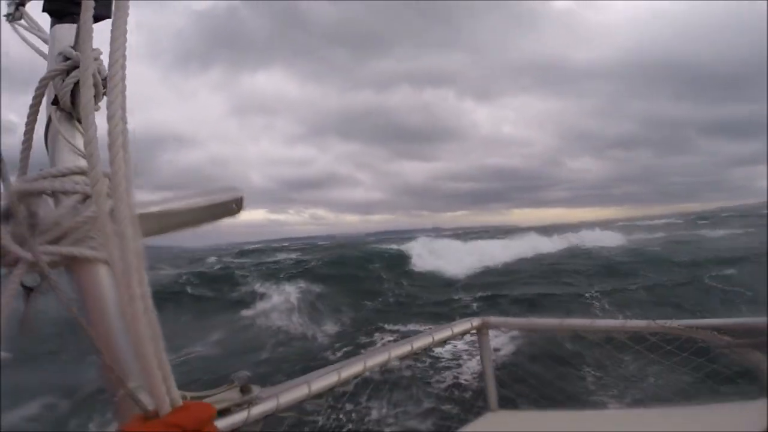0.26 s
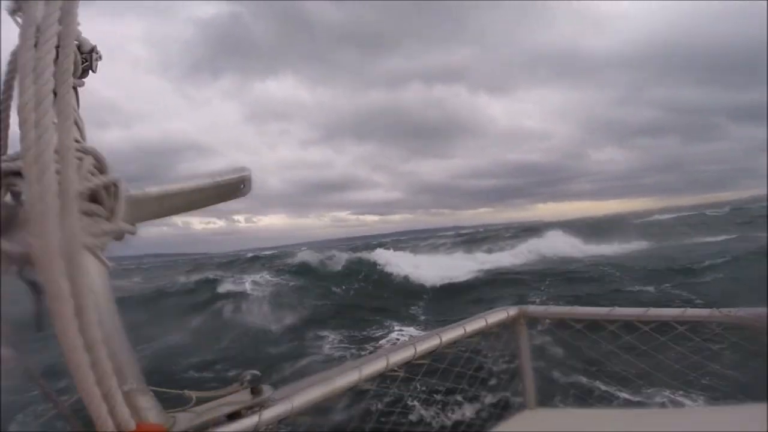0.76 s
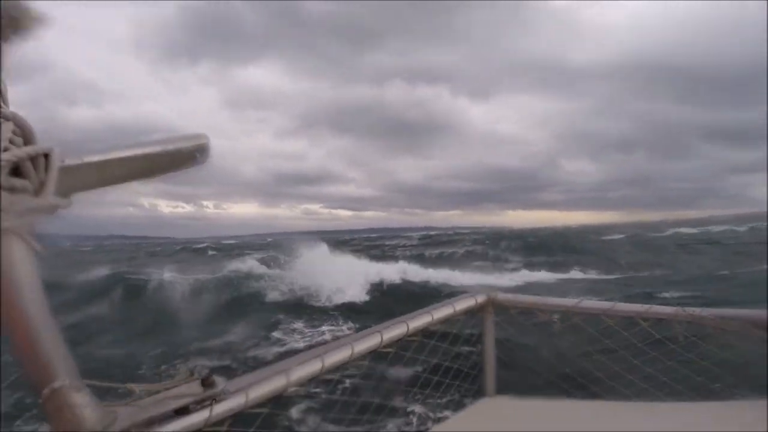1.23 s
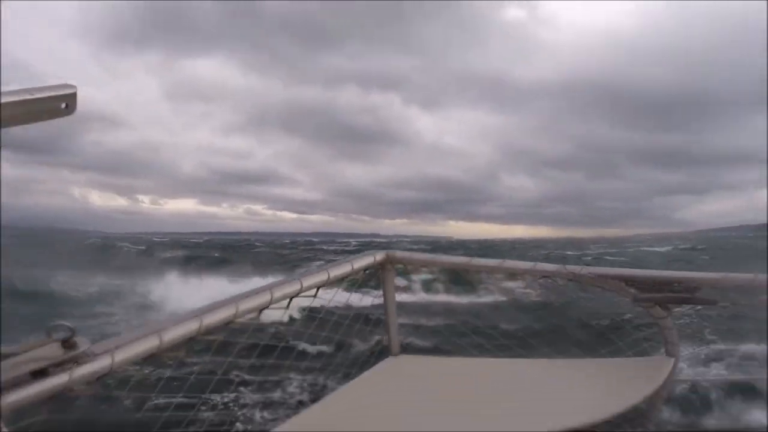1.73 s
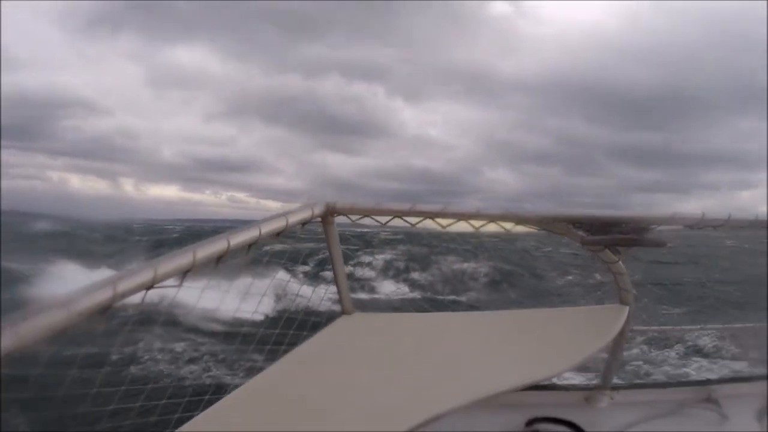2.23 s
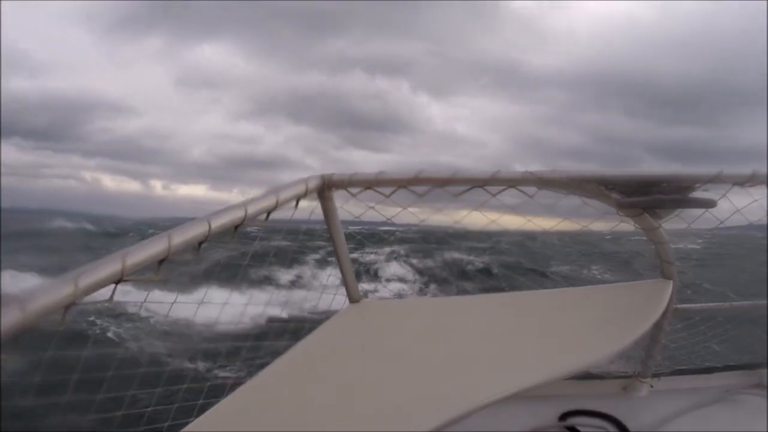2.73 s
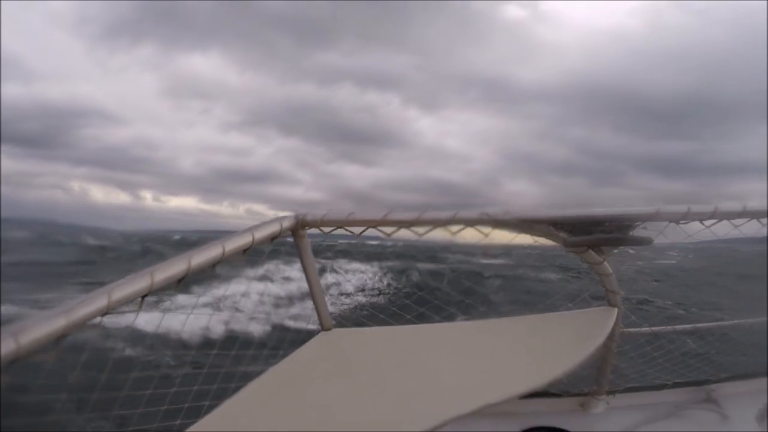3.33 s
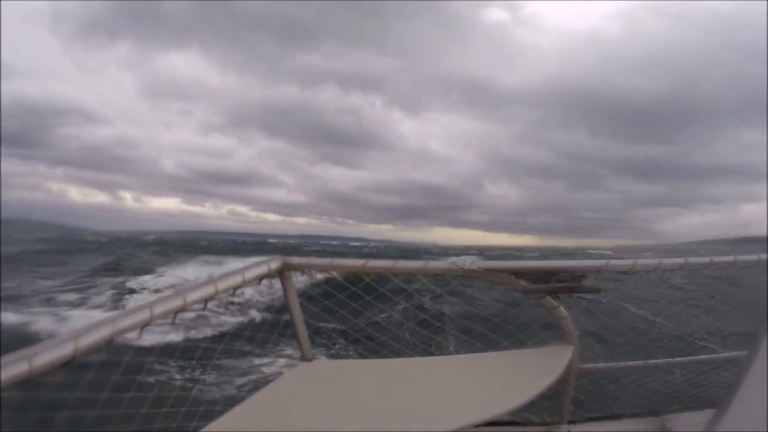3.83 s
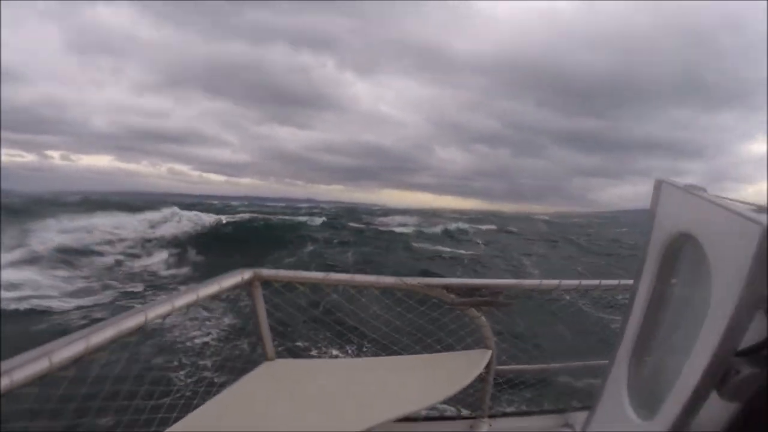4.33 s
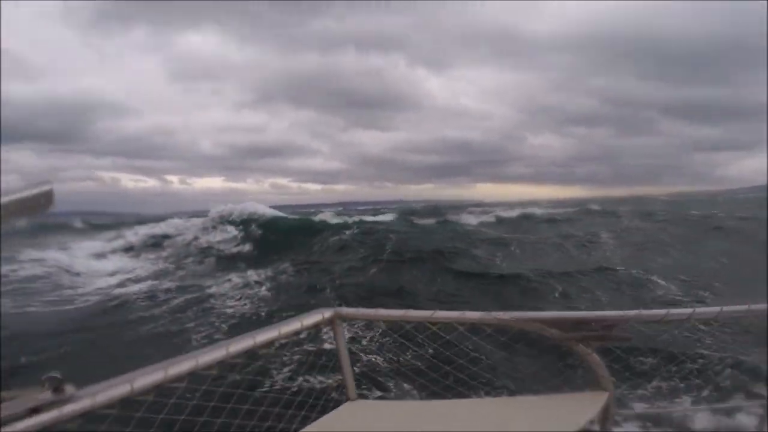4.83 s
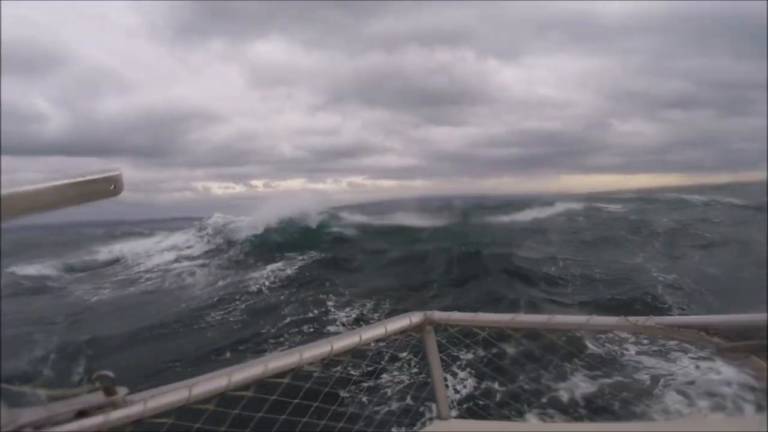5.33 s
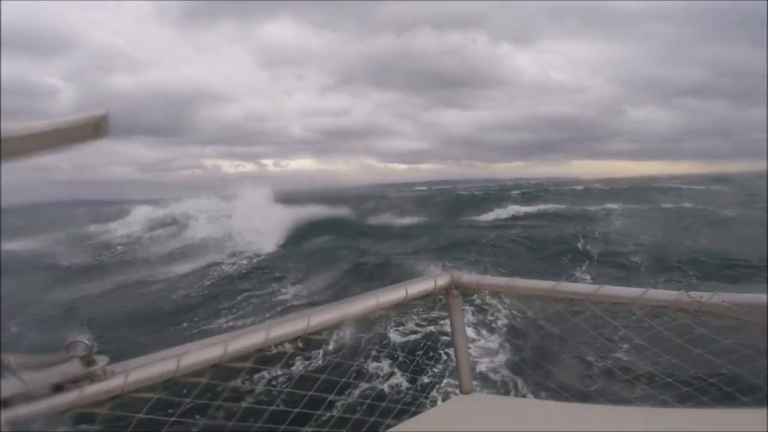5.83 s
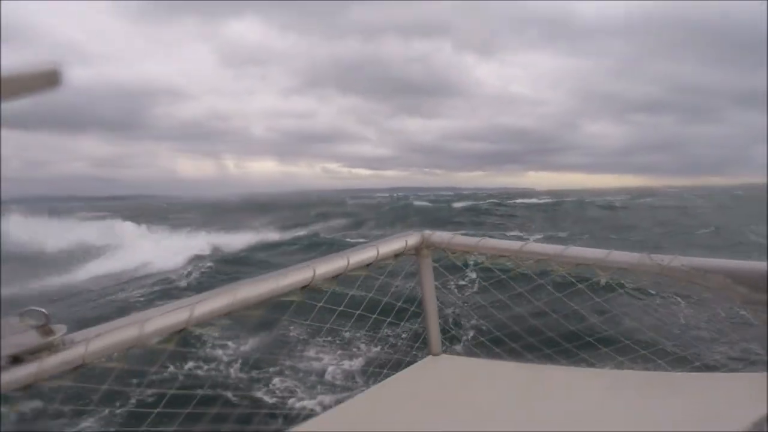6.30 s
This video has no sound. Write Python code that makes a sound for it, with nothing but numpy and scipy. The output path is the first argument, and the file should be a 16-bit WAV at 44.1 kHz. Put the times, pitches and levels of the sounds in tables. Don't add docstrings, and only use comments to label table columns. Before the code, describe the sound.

Very close, rough wind noise dominates: breathy whistling rush around two to three kilohertz, fluttering rumble and soft low slaps. It builds to a sustained gust, falters, then returns in snatches between near-silent dips, with a last strong surge near the end. Occasional bright droplet clicks hit the housing. Far surf, slight hiss and an extremely thin electronic whine lie beneath, outdoors on a boat.

```python
import sys
import numpy as np
from scipy import signal
from scipy.fft import rfft, irfft
from scipy.io import wavfile
from scipy.ndimage import uniform_filter1d

SR = 44100
rng = np.random.default_rng(int(sys.argv[2]) if len(sys.argv) > 2 else 0)


def waveform_to_disk(signal):
    frames = np.transpose(np.atleast_2d(signal))
    scaled = np.clip(frames, -1, 1) * 32767
    samples = np.round(scaled).astype(np.int16)
    wavfile.write(sys.argv[1], SR, samples)


def volts_from_db(level):
    exponent = np.asarray(level, float) / 20
    return 10 ** exponent


N = 289296


def unit(x):
    return x / np.sqrt(np.mean(x ** 2))


def coloured(shape):
    hz, db = np.transpose(shape)
    f = np.arange(N // 2 + 1) * SR / N + 1
    gain_db = np.interp(np.log(f), np.log(hz), db, -90, -90)
    return unit(irfft(rfft(rng.standard_normal(N)) * volts_from_db(gain_db), N))


def ring(x, hz, width):
    return signal.lfilter(*signal.iirpeak(hz, hz / width, fs=SR), x)


def walk(rate):
    hold = int(SR / rate)
    steps = np.repeat(rng.standard_normal(N // hold + 1), hold)
    return unit(uniform_filter1d(uniform_filter1d(steps, hold), hold)[:N])


def port(db, bright_db, whirl):
    snaps = volts_from_db(np.minimum(3.5 * rng.exponential(size=N), 12)) * (rng.random(N) < 300 / SR)
    air = rng.standard_normal(N) + 2.0 * snaps
    air = air * volts_from_db(db + 0.18 * whirl + 1.42 * walk(250))
    return cavity(air, volts_from_db(bright_db)) / np.std(cavity(rng.standard_normal(N), 0.25))


# f/Hz, width/Hz, level/dB
CAVITY = [
    (1647, 338, -3),
    (2003, 534, -2),
    (2598, 434, 3),
    (3140, 2300, -23.5),
    (4120, 100, -15.5),
    (6063, 440, -10.5),
    (7240, 240, -21),
]


def cavity(x, bright):
    y = 0
    for k, (hz, width, db) in enumerate(CAVITY):
        drive = x * bright ** (hz > 3800)
        y = y + (-1) ** k * volts_from_db(db) * ring(drive, hz, width)
    y = y - .6 * ring(y, 4894, 1170)
    return signal.sosfilt(signal.butter(4, [1400, 7800], "band", fs=SR, output="sos"), y)


# t/s, rush at the port/dB, fineness of the turbulence/dB, weight of big vortices/dB
GUST = [(0.0, -28.5, -3, -1.5), (0.2, -24, -1.5, -1), (0.4, -26.5, -2, -0.5), (1.59, -17, -2.5, 0),
        (2.19, -20.5, 1, 0.5), (2.39, -26, 1, 2.5), (2.98, -28, -6.5, 2), (3.18, -20.5, 0, -3),
        (3.58, -49, -10, -1.5), (3.78, -28.5, -2, -0.5), (4.17, -36.5, -7, -1.5), (4.37, -24, -1, 2),
        (4.97, -29, -2.5, -2), (5.17, -43.8, -6, -1), (5.37, -23, 4, 4), (5.57, -29, -3, -0.5),
        (6.36, -20, 3.5, 2), (6.56, -30.5, -7, 3)]


def gale():
    s, *columns = np.transpose(GUST)
    return [np.interp(np.arange(N) / SR, s, c) for c in columns]


# t/s, length/s, change of rush/dB, fineness/dB
PUFFS = [(0.161, 0.027, 4.5, 2), (0.242, 0.016, 4, 0), (0.349, 0.04, 3, 0), (0.437, 0.03, 3.5, 3),
         (0.554, 0.023, 5, -1), (0.649, 0.056, 5.5, 3), (0.691, 0.026, 4, -5), (0.825, 0.061, 5.5, 4.5),
         (0.908, 0.061, 2.5, 2.5), (0.997, 0.07, 2, 2.5), (1.211, 0.023, 3, -5), (2.037, 0.01, 6, -1),
         (2.542, 0.045, 4.2, 0), (2.617, 0.013, 3.7, 4), (2.723, 0.011, 3, 12), (2.79, 0.048, 2.5, 7),
         (2.98, 0.017, 3, -13), (3.085, 0.025, 5, 2), (3.638, 0.019, 9.5, -14), (3.709, 0.0061, 5.5, -9),
         (4.129, 0.022, 5.5, 2), (4.448, 0.0095, 3.5, 8), (4.607, 0.022, 8, -8), (4.91, 0.03, 5, 7),
         (5.305, 0.0095, 12.5, -3), (5.386, 0.064, 5.5, 3), (5.715, 0.093, 3.7, -2.5),
         (5.797, 0.12, 1.8, 4), (6.133, 0.019, 1.5, 19.5), (6.385, 0.047, 4, 2)]
# t/s, length/s, change of rush/dB, fineness/dB
LULLS = [(0.077,0.044,-5.5,4),(.61,0.026,-2,-4),(0.804,0.034,-3,3),(1.248,0.09,-2,1),(1.465,0.03,-3.5,4),(1.568,0.02,-3,4),(1.72,0.076,-1.5,-4),(2.289,0.024,-5,1),(2.467,0.038,-8,-3),(2.642,0.029,-6.5,-4),(2.683,0.027,-13.5,14),(3.052,0.11,-6.4,-5),(3.27,.06,-5,-18),(3.349,.07,-5,-10),(3.773,0.072,-10,-4),(3.864,0.14,-3.5,-14),(4.003,0.11,-12.5,3),(4.238,0.02,-17,2),(4.281,0.034,-16,3),(4.341,.036,-6,-8),(4.542,.121,-12,-7),(4.678,0.029,-10,4),(4.852,0.027,-5.5,-6),(4.947,0.046,-4,-1),(5.004,0.024,-12,8),(5.216,.019,-15,12),(5.237,0.1377,-10,-6),(5.775,0.016,-7.5,5),(6.021,.039,-5.5,1),(6.29,0.041,-4.5,-6)]


def eddies(rise_s, fall_s):
    db = np.zeros((2, N))
    for s, length, change, fine in PUFFS + LULLS:
        db[:, int(s * SR):int((s + length) * SR)] += np.array([[change], [change + fine]])

    def slew(seconds):
        k = int(seconds * SR) + 1
        return uniform_filter1d(db, k, origin=(k - 1) // 2)

    return np.maximum(slew(rise_s), slew(fall_s))


# t/s, overshoot/dB, thump of the vortices/dB
FRONTS = [(.121,7.5,2.5),(.16,5,-0.5),(0.435,4,3),(0.655,5.5,4),(.83,3,6),(2.51,3.5,-5),(2.671,4.5,-2.5),(2.715,1.5,1),(2.983,5.5,-1),(3.05,2.5,3.5),(3.327,10,-2.5),(3.713,4.5,-2.5),(3.801,8,0),(3.85,9.5,3.5),(4.128,5.5,1),(4.258,-6.5,-1),(4.315,0.5,-4),(4.38,4.5,-0.5),(4.606,5.5,1),(4.665,0.5,3),(4.717,5.5,0),(4.836,5.5,0.5),(4.888,5,-1),(5.028,4,3),(5.304,1.5,-5.5),(5.334,4.5,0),(5.374,1.5,5),(5.451,2.5,-2.5),(5.792,0,2),(6.125,4.5,-1)]


def fronts():
    overshoot_s, thump_s, draw_s = 0.0058, 0.1, 0.018
    s, db, thump_db = np.transpose(FRONTS)[:, :, None]
    lag = np.arange(0, N, 8) / SR - s
    after, before = lag >= 0, lag < 0

    def fade(size, decay):
        return np.repeat((size * np.exp(-np.abs(lag) / decay)).sum(0), 8)[:N]

    return fade(db * after, overshoot_s) - fade(db * before, draw_s), fade(thump_db * after, thump_s)


# f/Hz, level/dB
BUFFET = [(8.8, -48), (15, 0.5), (81, 2.5), (250, -14.5), (320, -17), (550, -120)]


def buffet(gust, weight, strike, thump, heave):
    db = -31.5 + 0.31 * gust + 0.76 * weight + .6 * thump + 1.03 * heave
    db = db + .3 * uniform_filter1d(strike, 900) + 1.9 * walk(13)
    return coloured(BUFFET) * volts_from_db(db)


# f/Hz, level/dB
FLUTTER = [(120, -2), (200, -1), (350, -6), (550, -12.5), (800, -16), (1200, -17), (1500, -18.5)]


def flutter(gust, weight, strike, thump, heave, whirl):
    vortices = coloured(FLUTTER)
    big = signal.sosfiltfilt(signal.butter(3, 420, fs=SR, output="sos"), vortices)
    small = vortices - big
    vortices = big * volts_from_db(1.76 * walk(35) + 0.7 * heave) + small * volts_from_db(0.21 * whirl + 2.1 * walk(60))
    db = -37.5 + 0.66 * gust + weight + thump + 0.72 * uniform_filter1d(strike, 200)
    return vortices * volts_from_db(db)


# f/Hz, level/dB
EDGE = [(6500, -4), (7600, 14), (8500, 5), (9500, 9), (10800, 6), (12000, -0.5), (14000, -5), (15200, -26)]


def edge(gust, fine, spit, whirl):
    db = -56.5 + 0.87 * gust + fine + 0.93 * spit + 0.28 * whirl
    return coloured(EDGE) * volts_from_db(db + 1.5 * walk(60) + 1.4 * walk(300))


# t/s, peak/dB, swing f/Hz, length/s
SLAPS = [(0.142, -7.5, 52.7, 0.016), (0.67, -17, 68.6, 0.017), (0.85, -9, 73.4, 0.04),
         (1.352, -13, 94.5, 0.038), (1.691, -14, 53.8, 0.018), (1.885, -13, 43.1, 0.02),
         (2.416, -9, 62.6, 0.019), (2.724, -12, 39, 0.018), (2.977, -11, 40.4, 0.031),
         (3.485, -24, 95, 0.016), (3.537, -19, 92, 0.014), (4.174, -13, 84, 0.018),
         (4.321, -18, 48.4, 0.04), (4.82, -15, 40, 0.024), (5.163, -25, 45.8, 0.037),
         (5.375, -14, 151.7, 0.044), (5.392, -10, 99, 0.024), (5.601, -15, 56.5, 0.031),
         (6.129, -15, 149, 0.034), (6.36, -11.5, 121, 0.046), (6.404, -25, 92, 0.029)]


def slaps():
    out, t = np.zeros(N + 4000), np.arange(4000) / SR
    for (s, db, hz, length), side in zip(SLAPS, rng.choice([-1, 1], len(SLAPS))):
        swing = np.sin(2 * np.pi * hz * t) * t / length * np.exp(1 - t / length * 2) * 2
        out[int(s * SR):int(s * SR) + 4000] += side * volts_from_db(db - 9.5) * swing
    return out[:N]


# t/s, peak/dB, ring f/Hz, brightness/dB
DROPS = [(0.5984, -51, 8700, -6), (0.614, -40, 9280, -7.5), (0.6479, -38, 9130, -6),
         (0.7187, -29, 9470, -6), (0.852, -25, 9300, -8), (1.0625, -35, 9520, 2), (1.1344, -34, 8930, -3),
         (1.1877, -36, 9990, -6), (1.225, -24, 9550, -13), (1.2905, -41, 9800, -6), (1.3029, -28, 9600, -6),
         (1.9894, -36, 8910, -6), (2.55, -31, 9550, -11), (2.7262, -37, 9680, -9), (2.9846, -37, 9210, -6),
         (3.2036, -26, 9400, -10), (3.2281, -42, 9290, -6), (3.3293, -51, 8850, -6),
         (3.4291, -49, 10000, -6), (3.9065, -46, 9090, -20), (4.2587, -44, 8800, -17),
         (4.2715, -38, 10200, -6), (4.8888, -52, 9640, -6), (5.5558, -48, 9990, -6)]


def drops():
    out, t = np.zeros(N + 400), np.arange(400) / SR
    for (s, db, hz, bright_db), turn in zip(DROPS, rng.random(len(DROPS))):
        tick = np.sin(2 * np.pi * hz * t) * np.exp(-t / 0.00036)
        splat = np.sin(2 * np.pi * (11800 + 2200 * turn) * t) * np.exp(-t / .00015)
        a = int((s + .0007) * SR)
        out[a:a + 400] += volts_from_db(db + 6.0) * (tick + volts_from_db(bright_db - 4) * splat)
    return out[:N] + volts_from_db(3) * ring(out[:N], 5500, 1700)


# f/Hz, level/dB
BREAKERS = [(150, -22), (407, 2), (728, -32), (890, -4), (2700, -5.5), (3960, -18), (6020, -6.5),
            (12000, -53)]


def breakers():
    return coloured(BREAKERS) * volts_from_db(-49 + 0.47 * walk(9.6))


# f/Hz, level/dB
WHINE = [(11687, -84), (11719, -78), (14626, -87)]
# f/Hz, level/dB
CIRCUIT = [(5000, -10), (8000, -4), (12000, -9), (14500, -18), (15300, -14)]


def circuit():
    t = np.arange(N) / SR
    tones = 0
    for hz, db in WHINE:
        tones = tones + volts_from_db(db + 4) * np.sin(2 * np.pi * hz * t + .35 * walk(12))
    early_db = -11 * (t < 2.4)
    return tones * volts_from_db(early_db) + volts_from_db(-64) * coloured(CIRCUIT)


def scene():
    rush, fine, weight = gale()
    gust = rush + 28
    (strike, spit), whirl = eddies(0.00033, 0.0025), walk(40)
    (front, thump), heave = fronts(), walk(14)
    strike, spit = strike + front, spit + 2.3 * front
    bright_db = .3 * (spit - strike) + 0.49 * fine + 1.12 * walk(25)
    wind = port(rush - .6 + 1.065 * strike, bright_db, whirl)
    wind += buffet(gust, weight, strike, thump, heave)
    wind += flutter(gust, weight, strike, thump, heave, whirl)
    wind += edge(gust, fine, spit, whirl)
    return (wind + slaps() + drops() + breakers() + circuit())[None]


def thin_out(piece, hz, coarse_db):
    window = signal.windows.cosine(len(piece))
    lines = rfft(piece * window)
    power, f = np.abs(lines) ** 2, np.arange(len(lines)) * SR / len(piece)
    band_power = uniform_filter1d(power, size=25)
    step = band_power[f > 1500].max() * volts_from_db(2 * coarse_db)
    spared = np.repeat(rng.random(len(f) // 6 + 1) < .3, 6)[:len(f)]
    weak = band_power < 2 * step
    lost = (f > hz) | (weak & ~spared) | (~weak & (power < 2 * step))
    return window * irfft(lines * lost, len(piece))


def roll_off(x):
    return signal.sosfilt(signal.butter(12, 15710, fs=SR, output="sos"), x)


# middle t/s, length/s, kept up to f/Hz, threshold under the strongest band/dB
THINNED = [(.178, .046, 6600, -21), (.361, .023, 7000, -24), (.596, .023, 7000, -24),
           (.682, .023, 7600, -27), (2.586, .023, 7000, -21), (2.842, .055, 6600, -20),
           (3.12, .023, 6800, -23), (3.186, .023, 7000, -25), (3.675, .023, 7000, -20),
           (4.015, .023, 6800, -18), (4.096, .023, 6800, -18), (4.932, .023, 7400, -23),
           (5.149, .023, 6700, -18), (5.182, .023, 9000, -17), (5.401, .023, 6800, -24),
           (5.467, .023, 7600, -24), (6.133, .04, 7200, -21)]


def record(dry):
    x = signal.sosfilt(signal.ellip(8, .3, 60, 15200, fs=SR, output="sos"), dry[0])
    top = signal.sosfiltfilt(signal.butter(8, 13800, "high", fs=SR, output="sos"), x)
    x = x + top * (volts_from_db(5.5 * walk(45) - 2) - 1)
    out, hop = x.copy(), 1024
    for s, length, hz, coarse_db in THINNED:
        count = round(length * SR / hop)
        depth = .92 if count == 1 else .99
        for a in int(s * SR) - (count + 1) * hop // 2 + hop * np.arange(count):
            out[a:a + 2 * hop] -= depth * thin_out(x[a:a + 2 * hop], hz, coarse_db)
    return roll_off(out[None])


dry = scene()
out = record(dry)
waveform_to_disk(out)
```